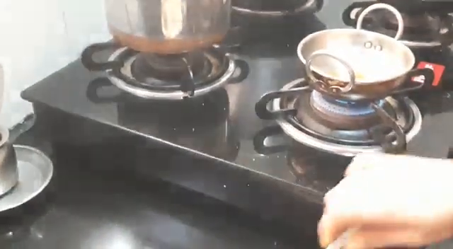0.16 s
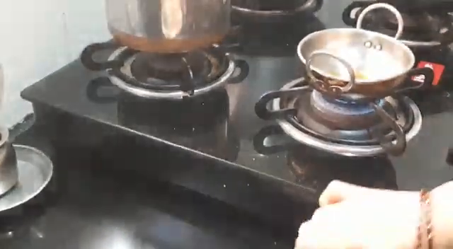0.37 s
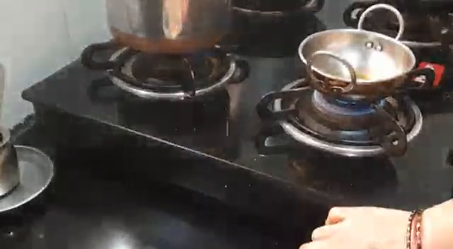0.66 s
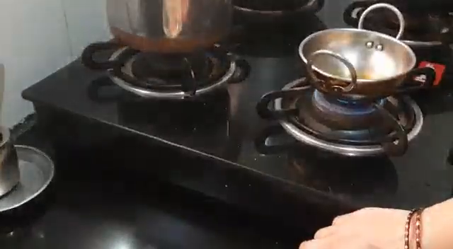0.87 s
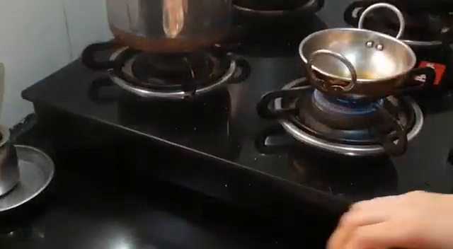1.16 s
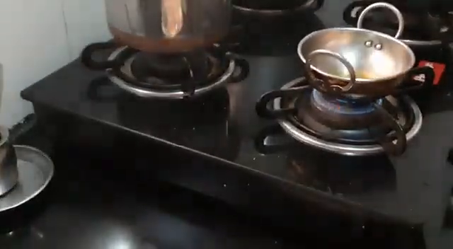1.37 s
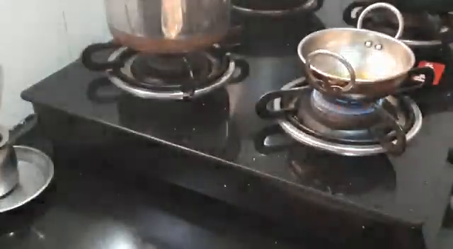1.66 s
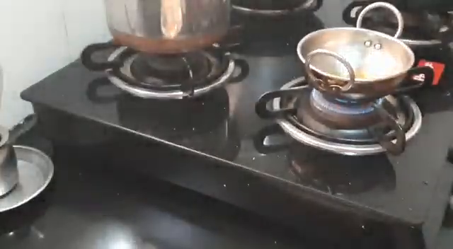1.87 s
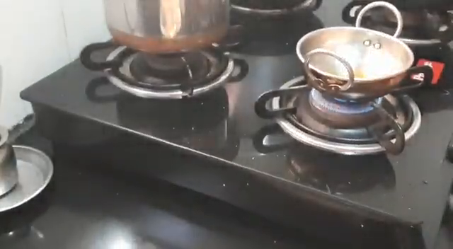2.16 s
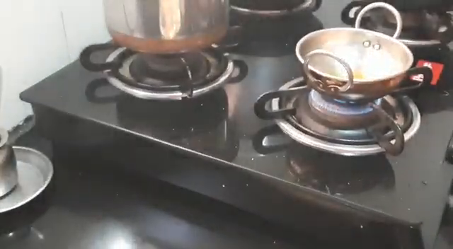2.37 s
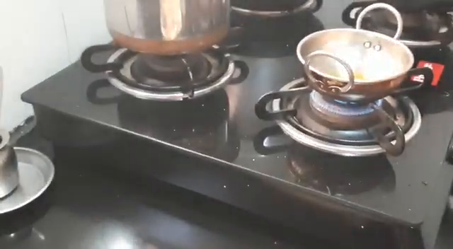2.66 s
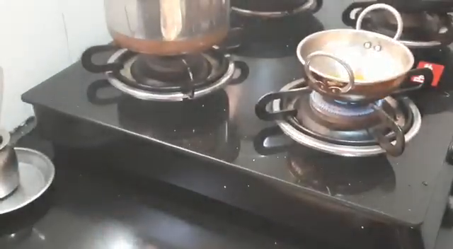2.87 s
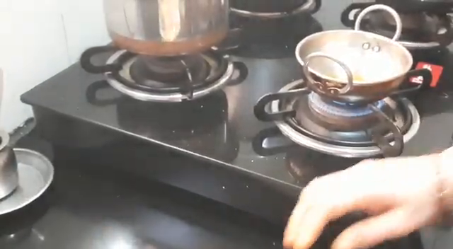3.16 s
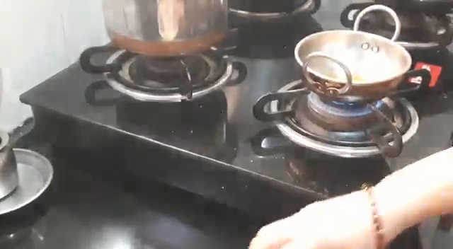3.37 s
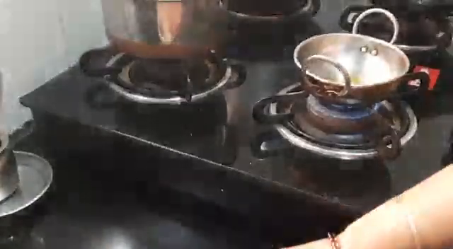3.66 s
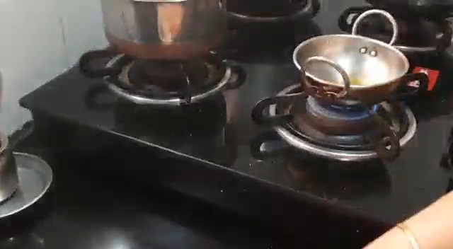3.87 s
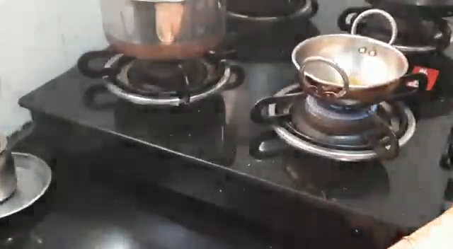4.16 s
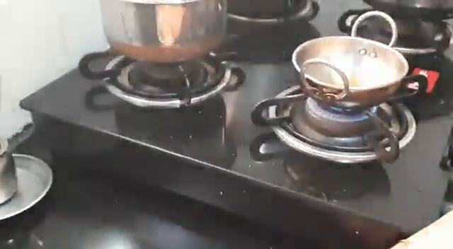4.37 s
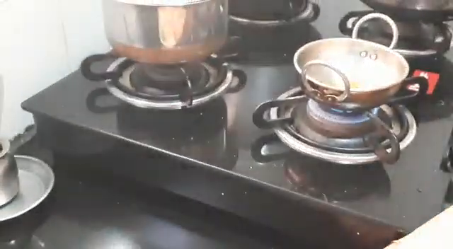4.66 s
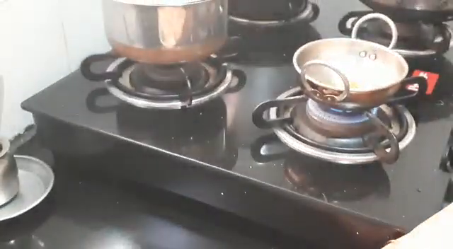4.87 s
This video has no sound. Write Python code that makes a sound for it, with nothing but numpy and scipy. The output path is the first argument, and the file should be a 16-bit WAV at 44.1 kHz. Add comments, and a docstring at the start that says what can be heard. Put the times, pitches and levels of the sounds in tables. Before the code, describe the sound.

Oil fizzes softly in a small pan and seeds pop, while a steel spoon drops on a stone counter and kitchen things knock.

```python
"""Mustard seeds in hot oil

In a tiled kitchen, oil heats in a small steel pan and fizzes more and more over a gas flame's murmur.
Single seeds burst with sharp cracks that ring round the room. A steel spoon drops on the stone
counter and settles; a tin, a lid and other utensils are knocked about, and a sleeve rustles."""
import sys
import numpy as np
from scipy import signal
from scipy.fft import rfft, irfft
from scipy.io import wavfile
from scipy.ndimage import uniform_filter1d

SR = 44100
rng = np.random.default_rng(int(sys.argv[2]) if len(sys.argv) > 2 else 0)


def to_wav(sig):
    """Store sig (one row per channel, or 1-D mono) as 16-bit WAV at the path in sys.argv[1].

    Samples outside -1..1 are clipped; the rate is SR.
    """
    pcm = np.clip(np.atleast_2d(sig), -1, 1) * 32767
    pcm = np.round(pcm).astype(np.int16)
    wavfile.write(sys.argv[1], SR, pcm.T)  # frames by channels


N = 221514
TIME = np.arange(N) / SR
TAIL = 2 ** 15  # samples for one hit to die away

# borders of six bands, from bass to treble: edge_hz
BAND_EDGES_HZ = (200, 700, 1500, 3000, 6000, 10000, 16000)
BAND_HZ = np.sqrt(np.multiply(BAND_EDGES_HZ[1:], BAND_EDGES_HZ[:-1]))


def seeds():
    """Seeds burst and oil spits: each crack rings briefly at its own pitch and ticks the pan."""
    # bursts: start_s, pitch_hz, level_db, ring_db, top_hz
    pops = [(1.239, 6200, -59.5, 25, 7500), (1.459, 7700, -57, 13, 10000), (1.558, 3760, -69, 10.5, 8000),
            (1.723, 3930, -47, 17, 7300), (2.359, 5130, -42, 12.5, 4600), (3.07, 7440, -46.5, 18, 12000),
            (3.082, 11900, -42.5, 5, 15000), (3.243, 11500, -25.5, 3, 15000), (3.449, 9750, -45, 16, 15000),
            (3.652, 11800, -37.5, 3, 15000), (4.228, 11650, -26.5, 3.5, 15000),
            (4.821, 4600, -29.5, 12, 5000), (4.822, 12500, -31.5, 0.5, 15000),
            (4.857, 4330, -38.5, 6, 11000), (4.866, 11700, -31.5, 0.9, 15000),
            (4.875, 10100, -60, 10, 15000)]
    # the pan's ringing notes: pitch_hz, width_hz, boost_db
    pan_notes = [(1240, 890, 11), (1785, 20, 6), (2580, 500, 10), (3820, 440, 9.4), (5630, 700, 1.6)]
    out = np.zeros((2, N))
    for start_s, pitch_hz, level_db, ring_db, top_hz in pops:
        # a crack is weaker below its pitch and above its top
        fall_db_per_octave = 5 + 1.18 * ring_db
        tone_db = -fall_db_per_octave * octaves_over(pitch_hz, BAND_HZ)
        tone_db -= 20 * octaves_over(BAND_HZ, top_hz)
        notes = pan_notes + [(pitch_hz, 0.29 * pitch_hz, ring_db)]
        room = kitchen(direct_db=8, near_s=0.0018)
        add(out, start_s, hit(level_db + tone_db - tone_db.max(), notes, room, dull_hz=16000))
    return out * undb(-1)


def fizz(bubbles_per_s=2200, heat_s=1.3):
    """Tiny steam bubbles break over a steady hiss; both grow louder as the oil heats."""
    # tone of the fizz: pitch_hz, level_db
    tone = [(700, -12.5), (1800, -16.5), (3000, -18.5), (3900, -11), (5500, -3), (7000, -4.5), (8200, 1),
            (9600, 0.1), (12000, 0), (14000, -7.5), (16000, -7.5)]
    sizes = undb(2 * np.minimum(rng.exponential(size=N), 4))
    ticks = (rng.random(N) < bubbles_per_s / SR) * sizes * rng.choice([-1, 1], N)
    echoes = rng.standard_normal((2, 256)) * np.exp(-np.arange(256) / 40)
    bubbles = unit(signal.fftconvolve(ticks[None], echoes)[:, :N])
    hiss = undb(-1) * rng.standard_normal((2, N))
    rising_db = -58 - 18.5 * np.exp(-TIME / heat_s)
    return colour(bubbles + hiss, tone) * lean_left(5) * undb(rising_db)


def spoon():
    """A steel spoon hits the counter, rings and bounces to rest."""
    # hits: start_s, level_db, thud_db_per_octave, edge_db_per_octave
    hits = [(0.348, -46.5, 11.5, 3.5), (0.4585, -18.5, 1.5, -1), (0.473, -24.5, -7.5, 2.5),
            (0.857, -36, 2.5, 4), (0.894, -32, 2, -2.5), (0.925, -41.5, 6.5, -17)]
    # tone in the six bands: level_db
    tone = (-26.5, -15, -1, -3.5, -5.5, -6.5)
    # ringing notes: pitch_hz, width_hz, boost_db
    notes = [(1294, 21, 5), (1409, 15, 8), (1601, 25.65, 9), (1649, 28, 7), (1738, 25, 9), (2035, 24, 6.5),
             (2176, 120, 8), (2435, 18, 8), (2780, 35, 11.5), (3303, 40, 6.5), (3394, 40, 6), (4400, 19, 9),
             (4800, 30, 8), (5220, 94, 4)]
    return knocks(hits, tone, notes, direct_db=5.5, near_s=0.0021, dull_hz=12300) * undb(2)


def tin():
    """A knocked tin rocks on the counter with a low, hollow ring."""
    # hits: start_s, level_db, thud_db_per_octave, edge_db_per_octave
    hits = [(3.288, -36.5, 0.5, 5), (3.303, -47.5, 5, 4), (3.32, -60, 8, 0), (3.577, -41.5, -0.5, -0.5),
            (3.6, -41.5, 1, -4), (3.652, -47, 0.5, -5)]
    # tone in the six bands: level_db
    tone = (-0.5, -7, -1.5, 1.5, -5.5, -13)
    # ringing notes: pitch_hz, width_hz, boost_db
    notes = [(241, 55, 12), (304.8, 24, 24), (372, 14, 16.5), (409, 16.5, 23), (503, 65, 15.4),
             (820, 250, 6), (1112, 70, 11.5), (1994, 51, 9), (2570, 360, 7.2), (3266, 82, 16.5)]
    return knocks(hits, tone, notes, direct_db=-1.5, near_s=0.004, dull_hz=14000) * undb(2.5)


def utensils():
    """Utensils knock lightly as they are moved."""
    # hits: start_s, level_db, thud_db_per_octave, edge_db_per_octave
    hits = [(4.034, -58, 4.5, 6), (4.059, -43.5, 0, 4), (4.0622, -36, 0.5, -3.5), (4.082, -40, 0, -18),
            (4.396, -44, -11, -10), (4.435, -36.5, -12.5, -11), (4.447, -49.5, -1, -7),
            (4.822, -48, 3.5, -10), (4.866, -59, 6.5, -0.5)]
    # tone in the six bands: level_db
    tone = (-10, -15.5, -5.5, 0.5, -5.5, -2)
    # ringing notes: pitch_hz, width_hz, boost_db
    notes = [(940, 110, 9), (1220, 69, 5.5), (1914, 37, 6.7), (2307, 60, 8.5), (2910, 130, 5.7),
             (3400, 280, 4.1), (4550, 92, 2.3)]
    return knocks(hits, tone, notes, direct_db=9.5, near_s=0.0018, dull_hz=12600) * undb(-1)


def lid():
    """A small steel lid clinks with a very high ring."""
    # hits: start_s, level_db, thud_db_per_octave, edge_db_per_octave
    hits = [(1.352, -64.5, 3.5, 2), (3.319, -33.5, 11, -6), (3.333, -47, 0, 8), (3.379, -35.5, -9, 0),
            (4.034, -65, 0, 13)]
    # tone in the six bands: level_db
    tone = (-38, -37, -34, -34, 0, 0)
    # ringing notes: pitch_hz, width_hz, boost_db
    notes = [(7990, 100, 39), (8200, 140, 31), (12500, 160, 24), (13050, 230, 16), (13400, 340, 17)]
    return knocks(hits, tone, notes, direct_db=10, near_s=0.0038, dull_hz=18000) * undb(-5.5)


def jolt(start_s=0.4592, first_hz=260, last_hz=48, fall_s=0.0032, fade_s=0.0099):
    """The spoon's fall jolts the left microphone: a thump whose pitch drops quickly."""
    t = np.maximum(TIME - start_s, 0)
    cycles = last_hz * t + (first_hz - last_hz) * fall_s * (1 - np.exp(-t / fall_s))
    return -np.sin(2 * np.pi * cycles) * np.exp(-t / fade_s) * undb([[-11], [-46]])


def bump(at_s=3.768, pitch_hz=104, swell_s=0.02):
    """A soft bump on the counter swells at the room's own low note."""
    t = TIME - at_s
    return undb(-37) * np.sin(2 * np.pi * pitch_hz * t) * np.exp(-np.abs(t) / swell_s) * lean_left(4)


def rustle(rise_s=0.053, fade_s=0.11):
    """A sleeve and hand rub over the counter, catching and slipping unevenly."""
    # strokes: start_s, length_s, level_db
    strokes = [(2.959, 0.3, -55), (3.203, .11, -44.5), (3.554, .2, -56.5), (3.998, 0.058, -52.5),
               (4.339, 0.056, -51), (4.536, 0.2, -69.5), (4.695, .31, -49.5)]
    # tone of the rubbing: pitch_hz, level_db
    tone = [(200, -10), (600, -6.5), (1000, 0), (1400, -3), (1800, 5), (3100, 4), (3900, 1.5), (8000, -2),
            (12000, -5), (16000, -12)]
    loudness = np.zeros(N)
    for start_s, length_s, level_db in strokes:
        rise = np.clip((TIME - start_s) / rise_s, 0, 1)
        fade = np.exp(-np.maximum(TIME - start_s - length_s, 0) / fade_s)
        loudness += undb(level_db) * rise * fade
    grip_db = 2 * unit(uniform_filter1d(rng.standard_normal(N), size=500))
    return colour(rng.standard_normal((2, N)) * undb(grip_db), tone) * loudness * lean_left(5)


def burner():
    """The gas flame murmurs, lifted by the room's low notes."""
    # tone of the murmur: pitch_hz, level_db
    tone = [(20, -26), (45, -35.5), (70, -13), (90, -13.5), (101, 4), (118, -17), (135, -2.5), (155, -15.5),
            (250, -17.5), (380, -19), (520, -26), (750, -39.5), (1500, -49), (4000, -63)]
    # how loud the murmur is heard, quieter after the spoon, then slowly back up: time_s, level_db
    levels = [(0, -58), (.62, -59.5), (1.15, -63.5), (1.72, -61.5), (2.3, -57.5), (5.02, -55)]
    flame = rng.standard_normal(N) + undb(-7) * rng.standard_normal((2, N))
    level_db = np.interp(TIME, *np.transpose(levels)) + 2
    return colour(flame, tone) * undb(level_db) * lean_left(4)


def whistle(at_s=2.14, swell_s=0.14, pitch_hz=1180, width_hz=70):
    """A faint whistle swells and fades."""
    hz = np.fft.rfftfreq(N, 1 / SR)
    band = irfft(rfft(rng.standard_normal((2, N))) / (1 + ((hz - pitch_hz) / width_hz) ** 2), N)
    return unit(band) * np.exp(-((TIME - at_s) / swell_s) ** 2) * undb(-74.5)


def knocks(hits, tone_db, notes, direct_db, near_s, dull_hz):
    """All hits on one object: heavy ones bring out the counter's thud, hard ones a bright edge."""
    out = np.zeros((2, N))
    bass_octaves, treble_octaves = octaves_over(2200, BAND_HZ), octaves_over(BAND_HZ, 4200)
    for start_s, level_db, thud, edge in hits:
        band_db = level_db + np.array(tone_db) + thud * bass_octaves + edge * treble_octaves
        add(out, start_s, hit(band_db, notes, kitchen(direct_db, near_s), dull_hz))
    return out


def hit(band_db, notes, room, dull_hz):
    """A click rings an object and the room; the contact sets each band's level and dulls the top."""
    hz = np.fft.rfftfreq(TAIL, 1 / SR)
    body = 1 + sum(undb(db) ** 2 / (1 + (1.4 * (hz - pitch) / width) ** 2) ** 2
                   for pitch, width, db in notes)
    bands = zip(BAND_EDGES_HZ, BAND_EDGES_HZ[1:])
    power = np.array([body[(hz >= low) & (hz < high)].sum() / len(hz) for low, high in bands])
    contact_db = join_points(hz, BAND_HZ, band_db - 10 * np.log10(power))
    softness = 1 / np.hypot(1, (hz / dull_hz) ** 5)
    bass_loss = (hz + 1) ** 2 / (hz ** 2 + 150 ** 2)  # small things give off little bass
    return irfft(ring_after(np.sqrt(body) * undb(contact_db) * softness * bass_loss) * room)


def kitchen(direct_db, near_s, build_s=0.0057, thicken_s=0.016):
    """Spectrum of a click in the room: it arrives straight, off the stove top, then off the walls."""
    # time for echoes to fade by 60 dB: pitch_hz, fade_s
    echo_fades = [(300, 0.41), (1000, 0.38), (2100, 0.37), (4200, 0.31), (8000, 0.29), (13000, 0.3)]
    t, hz = np.arange(TAIL) / SR, np.fft.rfftfreq(TAIL, 1 / SR)
    near = rng.standard_normal((2, TAIL)) * np.exp(-t / near_s / 2)
    near[:, 1] += undb(11)  # the straight path
    density = 1 - 0.97 * np.exp(-(t / thicken_s) ** 2)  # few echoes at first, then many
    walls = rng.standard_normal((2, TAIL)) * (rng.random((2, TAIL)) < density) / np.sqrt(density)
    walls *= 1 - np.exp(-(t / build_s) ** 2)
    pitches, fades = np.transpose(echo_fades)
    tail = sum(rfft(walls * undb(-60 * t / fade_s)) * join_points(hz, pitches, share)
               for fade_s, share in zip(fades, np.eye(len(pitches))))
    alike = np.exp(-(hz / 750) ** 2)  # long waves reach left and right alike
    tail[1] = alike * tail[0] + np.sqrt(1 - alike ** 2) * tail[1]
    return undb(direct_db) * lean_left(10) * rfft(near) + lean_left(2) * tail


def ring_after(gain):
    """Spectrum of a sound with this tone that starts at once and rings afterwards."""
    cepstrum = irfft(np.log(gain))
    cepstrum[1:TAIL // 2] *= 2
    cepstrum[TAIL // 2 + 1:] = 0
    return np.exp(rfft(cepstrum))


def undb(db):
    """Turn decibels into a multiplier."""
    return 10 ** (np.asarray(db) / 20)


def unit(x):
    """Scale to an average power of one."""
    return x / np.sqrt(np.mean(x ** 2))


def lean_left(db):
    """Make the left side louder than the right, keeping the total power."""
    return unit(undb([[db], [0]]))


def join_points(hz, pitches, values):
    """Join points with straight lines on a scale of octaves."""
    return np.interp(np.log(hz + 1), np.log(pitches), values)


def octaves_over(hz, edge_hz):
    """Octaves above an edge; zero below it."""
    return np.maximum(np.log2(hz / edge_hz), 0)


def colour(x, tone):
    """Give a sound a tone and an average power of one."""
    hz = np.fft.rfftfreq(N, 1 / SR)
    return unit(irfft(rfft(x) * undb(join_points(hz, *np.transpose(tone))), N))


def add(out, start_s, sound):
    """Mix a sound in from a given time."""
    start = int(start_s * SR)
    out[:, start:start + sound.shape[1]] += sound[:, :N - start]


def scene():
    """Kitchen things, seeds, oil and flame together."""
    clatter = spoon() + tin() + utensils() + lid()
    return clatter + seeds() + fizz() + burner() + rustle() + jolt() + bump() + whistle()


def record(dry, top_hz=15750):
    """The phone cuts off the highest treble."""
    return signal.sosfilt(signal.ellip(10, 0.2, 80, top_hz, fs=SR, output="sos"), dry)


dry = scene()
out = record(dry)
to_wav(out)
```